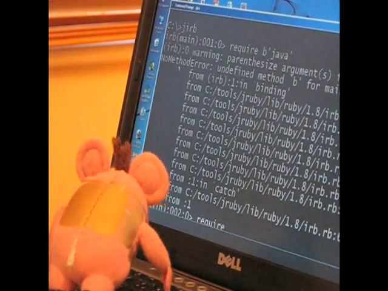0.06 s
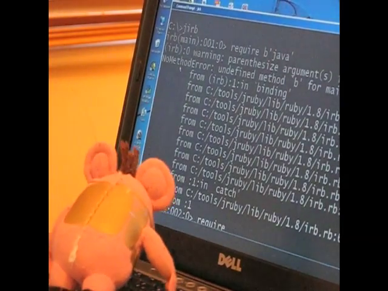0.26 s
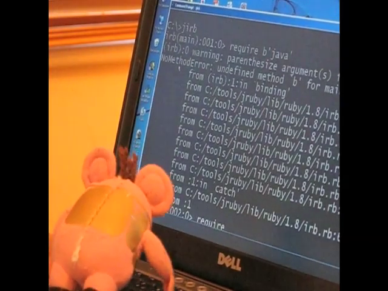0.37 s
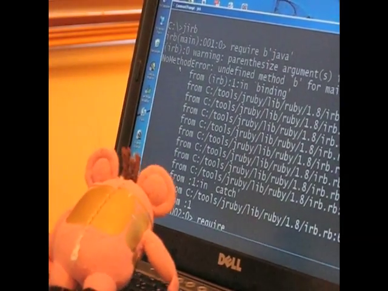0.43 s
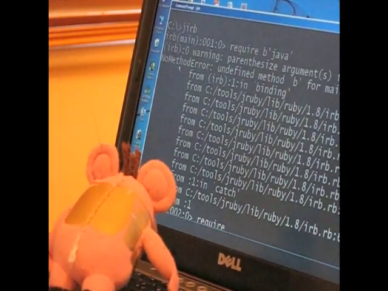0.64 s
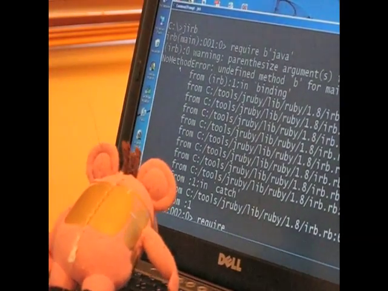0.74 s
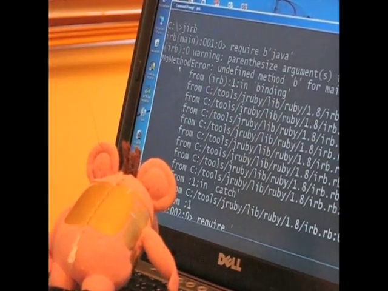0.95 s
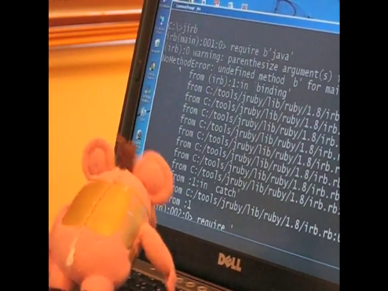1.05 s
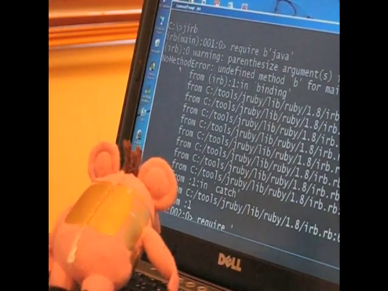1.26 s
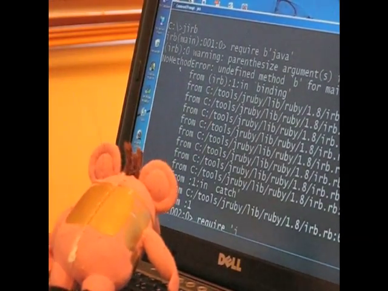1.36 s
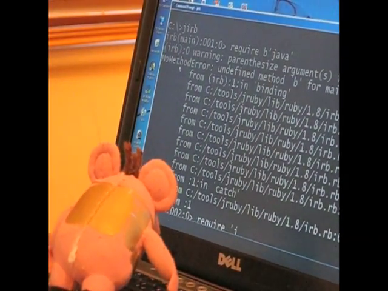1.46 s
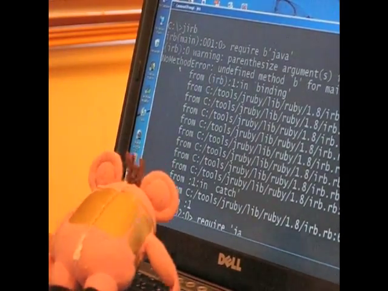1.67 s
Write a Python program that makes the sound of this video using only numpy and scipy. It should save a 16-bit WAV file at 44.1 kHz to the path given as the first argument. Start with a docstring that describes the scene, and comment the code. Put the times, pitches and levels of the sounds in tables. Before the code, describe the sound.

A few separate keystrokes on a laptop, heard close in a small bare room: a strong double clack from the space bar, later a crisp key, a faint finger swish, a duller key and tiny ticks over steady hiss.

```python
"""A few slow keystrokes on a laptop in a small, bare, quiet room.
Faint finger ticks; the space bar knocks on its stop, thumps the case and springs back with a clack.
Then a bright key, an airy finger swish and a duller key, trailed by light ticks.
Noise bursts excite coloured bodies for knocks and ticks; decaying sines make the thumps.
Each gets one near echo and a diffuse noise tail; steady hiss and a faint two-tone whine lie beneath."""
import sys
import numpy as np
from scipy import signal
from scipy.fft import rfft, irfft
from scipy.io import wavfile
from scipy.ndimage import uniform_filter1d

SR = 44100
rng = np.random.default_rng(int(sys.argv[2]) if len(sys.argv) > 2 else 0)


def waveform_to_disk(signal):
    """Save audio, clipped to [-1, 1], as 16-bit WAV at the path in sys.argv[1]."""
    frames = np.transpose(np.atleast_2d(signal))
    scaled = np.clip(frames, -1, 1) * 32767
    samples = np.round(scaled).astype(np.int16)
    wavfile.write(sys.argv[1], SR, samples)


N = 74970

# Knock spectra: space bar down and up, bright key, dull key (frequency [Hz], density [dB per Hz])
SPACE_DOWN = [(40, -37), (150, -31), (350, -10), (540, -16), (780, -8), (1050, -5.5), (1550, -5.5),
              (1720, 4), (2000, 4), (2170, -9.5), (2430, 5.5), (2900, -8.5), (4400, -10), (5200, -6),
              (5850, -4), (7300, -11.5), (10500, -9), (13000, -13.5), (16000, -34)]
SPACE_UP = [(40, -39), (150, -45), (300, -3), (600, -9.5), (770, -2), (930, -9), (1400, -5), (1700, 4),
            (2000, 1.5), (2350, -5.5), (2950, 0.5), (3700, -15), (5500, -4), (7800, -9.5), (12000, -13),
            (16000, -29)]
BRIGHT_KEY = [(40, -49), (150, -28), (300, -8.5), (400, -11.5), (830, 3.5), (1500, -17), (2800, -4),
              (4300, 0), (5600, -0.5), (6900, -5.5), (8200, -6.5), (10000, -8), (13000, -14.5),
              (16000, -28)]
DULL_KEY = [(40, -24), (150, -14), (480, -21), (680, 0), (1150, -7.5), (1450, -15), (1850, 7), (2300, -1.5),
            (2850, 7.5), (3550, 5), (4100, -2), (5500, 3.5), (7300, -4), (9300, -0.5), (10500, -10.5),
            (16000, -28)]
# Keys hitting their stops
# (time [s], level [dB], rattle time constant [s], room [dB], direct treble gain [dB], knock spectrum)
KNOCKS = [(.2092, 10.5, 0.0029, -3, 0, SPACE_DOWN), (0.3005, 10.5, 0.005, -2, 0.5, SPACE_UP),
          (.95, 3, 0.0018, -1.5, -9, BRIGHT_KEY), (1.3671, -1, 0.0012, -1.5, -6, DULL_KEY)]
# Blows that shake the case
# (time [s], level [dB], most excited pitch [Hz], spread [octaves], rise time constant [s])
THUMPS = [(.2094, -28, 775, 0.12, 0.00028), (.3035, -32.5, 307, 0.57, 0.003),
          (.9512, -40, 500, .25, 0.00033), (.9715, -33.5, 804, 0.093, 0.002),
          (1.368, -45.5, 285, 0.25, 0.0011)]
# Case modes (frequency [Hz], level [dB], t60 [s])
CASE_MODES = [(248, -26, 0.11), (303.7, 1.5, 0.091), (357, -4, 0.065), (458, -0.5, 0.12), (519, 1, 0.11),
              (690, -8, 0.12), (748, -4.5, .06), (790.4, -2, 0.083)]
# Light contacts of fingers and key caps
# (time [s], level [dB], cap pitch [Hz], width [Hz], ring [dB], treble [dB], rattle time constant [s])
TICKS = [(.001, -21.5, 10200, 3100, -1, 0, 0.0073), (.071, -26.5, 4230, 700, 2, 4, 0.0046),
         (.1998, -14.5, 2280, 1200, -3, 5, 0.0058), (0.2008, -21, 5500, 500, 26, -4, 0.00041),
         (0.2074, -17, 5700, 1200, -8, 6, 0.006), (0.3057, -11.5, 5530, 800, 4, 1, 0.0021),
         (0.944, -11, 4200, 1440, 5.5, -16, 0.0019), (0.9429, -26, 7900, 950, 25, -1.5, 0.001),
         (1.3586, -19, 2980, 700, 6.5, -5.5, 0.0027), (1.4745, -26, 1880, 547, 9.5, -4, 0.0018),
         (1.5065, -31, 5700, 805, 8, 2, 0.0019), (1.6472, -30.5, 4240, 810, 19.5, -3, 0.00081),
         (1.655, -36, 4530, 700, 17, 1, 0.00061), (1.665, -21, 4150, 1000, -3, -8, 0.0037)]
# Tick spectrum before cap ring and treble (frequency [Hz], density [dB per Hz])
TICK_COLOUR = [(40, -50), (150, -31), (450, -10), (850, 5.5), (2000, 10.5), (5000, 7), (12000, 0.5),
               (16000, -15.5)]
# Room tail colour (frequency [Hz], gain [dB])
ROOM_COLOUR = [(200, 1), (800, 4), (2000, 1), (4500, 0.5), (8000, 0.5), (11500, 4.5), (16000, 5)]
# Room tail decay (frequency [Hz], t60 [s])
ROOM_T60 = [(200, 0.37), (600, 0.23), (1700, 0.4), (4000, 0.4), (9000, 0.35), (15000, 0.19)]
# Hiss spectrum shape (frequency [Hz], density [dB per Hz])
HISS = [(12, -48), (20, -15.5), (187, -7.5), (248, -7.5), (285, -6), (399, -7.5), (434, -8.5), (472, -7.5),
        (1060, -9), (11800, -25), (13900, -28.5), (16000, -32.5)]
# Whine tones (frequency [Hz], level [dB rms])
WHINE = [(9480, -105), (14223, -74)]

SNAP_GAIN = 0.2  # first contact, against a rattle of unit energy
BEND_DELAY_1KHZ_S = 0.001202  # bending waves in the case; low notes arrive later
TREBLE_HZ, TOUCH_RISE_S = 7300, 0.0003  # soft fingers build up their contact
TICK_ROOM_DB, TICK_SHADE_DB, THUMP_ROOM_DB = 0, -2, -8
BRUSH_S, BRUSH_WIDTH_S, BRUSH_PEAK_DB, BRUSH_HZ = 1.19, 0.023, -60.5, 11000
ECHO_S, ECHO_DB = 0.0076, -14
ROOM_DELAY_S, ROOM_RISE_S = 0.002, 0.0025
SHADE_HZ = 10300  # direct-path treble gain acts above this
HISS_DB_RMS = -54
BAND_LIMIT_HZ = 16050


def knock(time_s, level_db, rattle_s, room_db, shade_db, colour):
    """A key hits the end of its travel: snap and rattle through its body colour."""
    sound = click(read(colour, bins()), rattle_s, SNAP_GAIN)
    return time_s, amp(level_db) * room(sound, room_db, shade_db)


def click(colour_db, rattle_s, snap_gain, rise_s=1 / SR):
    """A snap and a brief rattle of loose plastic excite the key; bending waves disperse the sound."""
    t = np.arange(2 * len(colour_db) - 2) / SR
    rattle = rng.standard_normal(len(t)) * np.exp(-t / rattle_s) * (1 - np.exp(-t / rise_s))
    rattle /= np.linalg.norm(rattle)
    rattle[0] += snap_gain
    force = rfft(rattle)
    # level out the smoothed force spectrum so that the colour alone sets the balance
    smooth_db = 10 * np.log10(uniform_filter1d(abs(force) ** 2, size=25))
    # phase of a group delay that goes as 1 / sqrt(frequency)
    dispersion = np.exp(-4j * np.pi * BEND_DELAY_1KHZ_S * np.sqrt(1000 * bins()))
    return irfft(force * dispersion * ring(colour_db - smooth_db))


def ring(colour_db):
    """Minimum-phase spectrum: a body of this colour that rings only after it is struck."""
    mirrored_db = np.concatenate([colour_db, colour_db[-2:0:-1]])
    log_gain = np.log(amp(mirrored_db))
    return np.exp(np.conj(signal.hilbert(log_gain)))[:len(colour_db)]


def thump(time_s, level_db, pitch_hz, spread_oct, rise_s):
    """Where the blow lands decides which low modes of the case answer."""
    t = np.arange(SR // 2) / SR
    modes = 0
    for hz, db, t60_s in CASE_MODES:
        excitation = np.exp(-(np.log2(hz / pitch_hz) / spread_oct) ** 2)
        decay = np.exp(-np.log(1000) * t / t60_s)
        modes = modes + amp(db) * excitation * decay * np.sin(2 * np.pi * hz * t)
    return time_s, amp(level_db) * room(modes * (1 - np.exp(-t / rise_s)), THUMP_ROOM_DB)


def tick(time_s, level_db, cap_hz, width_hz, ring_db, treble_db, rattle_s):
    """A light touch rings one resonance of a key cap."""
    hz = bins()
    cap = amp(ring_db) / (1 + (2 * (hz - cap_hz) / width_hz) ** 2)
    shelf_db = treble_db * hz ** 2 / (hz ** 2 + TREBLE_HZ ** 2)
    colour_db = read(TICK_COLOUR, hz) + 20 * np.log10(1 + cap) + shelf_db
    sound = click(colour_db, rattle_s, 0, TOUCH_RISE_S)
    return time_s, amp(level_db) * room(sound, TICK_ROOM_DB, TICK_SHADE_DB)


def brush():
    """A fingertip slides over a key: band noise swells and fades as skin rubs plastic."""
    t, hz = np.arange(N) / SR, np.fft.rfftfreq(N, 1 / SR)
    band = 1 / (1 + (2 * (hz - BRUSH_HZ) / (BRUSH_HZ / 2)) ** 2)
    noise = irfft(rfft(rng.standard_normal(N)) * band, N)
    swell = 1 / (1 + ((t - BRUSH_S) / BRUSH_WIDTH_S) ** 2)
    return amp(BRUSH_PEAK_DB) * unit(noise) * swell


def room(sound, room_db, shade_db=0):
    """Direct sound, one near echo and a diffuse tail that dies at its own speed in each band."""
    t = np.arange(SR // 2) / SR
    hz, frame_s, z = signal.stft(rng.standard_normal(len(t)), SR, nperseg=256)
    z *= np.exp(-np.log(1000) * frame_s / read(ROOM_T60, hz)[:, None])
    onset = np.clip((t - ROOM_DELAY_S) / ROOM_RISE_S, 0, 1)
    tail = rfft(signal.istft(z, SR)[1][:len(t)] * onset, SR)
    # level out the smoothed tail spectrum, then colour it
    smooth = np.sqrt(uniform_filter1d(abs(tail) ** 2, size=250))
    tail *= amp(room_db + read(ROOM_COLOUR, bins(size=SR))) / smooth
    response = irfft(tail)[:len(t)]
    direct = irfft(ring(shade_db * (1 - 1 / (1 + (bins() / SHADE_HZ) ** 10))))
    add(response, 0, direct)
    add(response, ECHO_S, amp(ECHO_DB) * direct)
    return signal.fftconvolve(sound, response)


def background():
    """Steady room hiss (shaped noise) with a thin electronic whine (sines)."""
    t, hz = np.arange(N) / SR, np.fft.rfftfreq(N, 1 / SR)
    hiss = unit(irfft(rfft(rng.standard_normal(N)) * amp(read(HISS, hz)), N))
    whine = sum(amp(db) * np.sqrt(2) * np.sin(2 * np.pi * f * t) for f, db in WHINE)
    return amp(HISS_DB_RMS) * hiss + whine


def amp(db):
    """Decibels to gain."""
    return 10 ** (np.asarray(db) / 20)


def read(points, hz):
    """Reads a table on a log-frequency axis."""
    f, value = np.transpose(points)
    return np.interp(np.log(hz + 1), np.log(f + 1), value)


def unit(x):
    """Scales to an rms of 1."""
    return x / np.sqrt(np.mean(x ** 2) + 1e-20)


def bins(size=4096):
    """Bin frequencies in Hz of a spectrum of this many samples."""
    return np.fft.rfftfreq(size, 1 / SR)


def add(mix, time_s, sound):
    """Mixes a sound in place at its time, cut at the end of the mix."""
    part = mix[max(round(time_s * SR), 0):][:len(sound)]
    part += sound[:len(part)]


def scene():
    """All key sounds over the background."""
    mix = background() + brush()
    for source, rows in ((knock, KNOCKS), (thump, THUMPS), (tick, TICKS)):
        for row in rows:
            add(mix, *source(*row))
    return mix[None]


def record(dry):
    """The recorder's band limit: a linear-phase low-pass."""
    lowpass = signal.firwin(511, BAND_LIMIT_HZ, window=("kaiser", 9), fs=SR)
    return signal.oaconvolve(dry, lowpass[None], "same")


dry = scene()
out = record(dry)
waveform_to_disk(out)
```